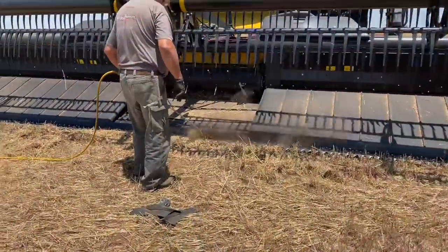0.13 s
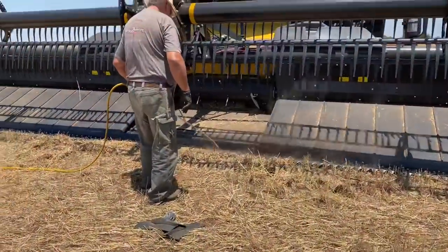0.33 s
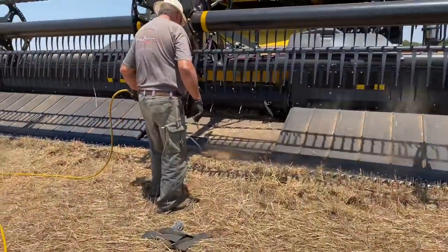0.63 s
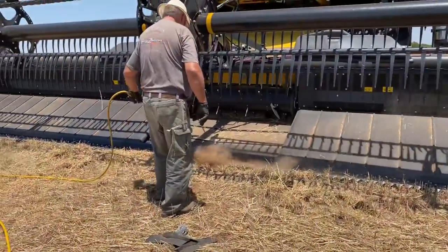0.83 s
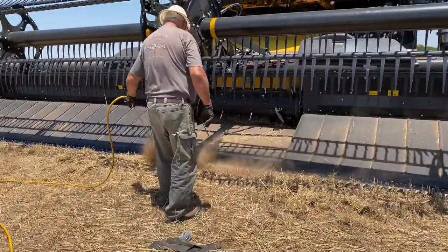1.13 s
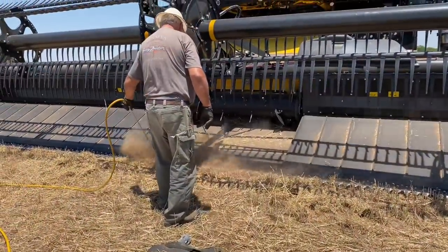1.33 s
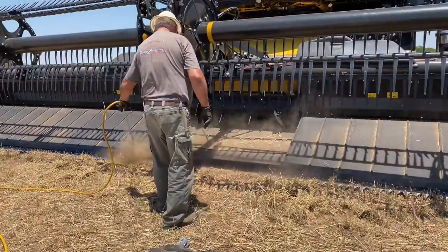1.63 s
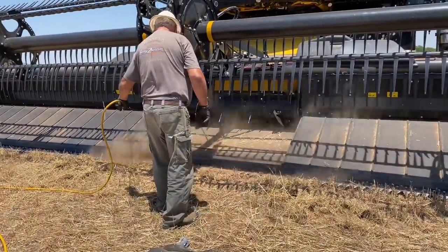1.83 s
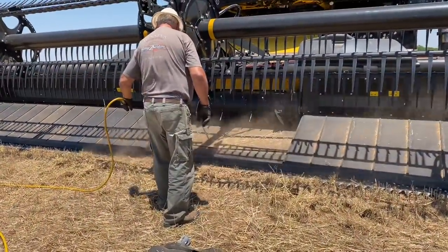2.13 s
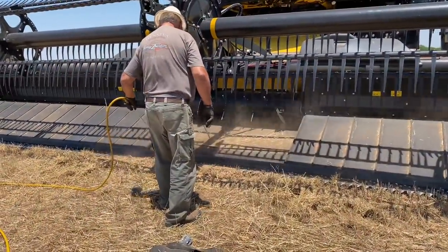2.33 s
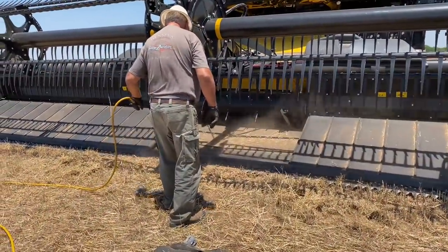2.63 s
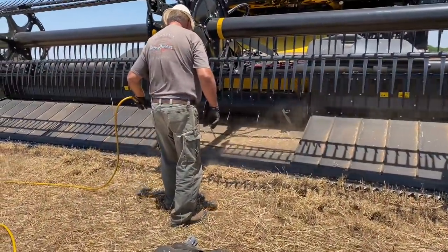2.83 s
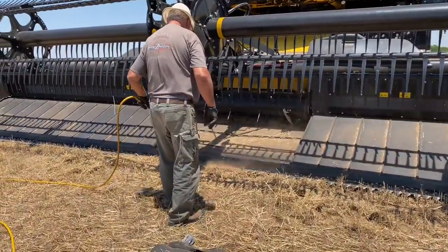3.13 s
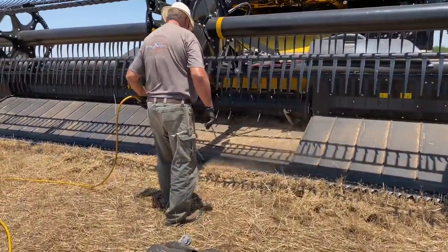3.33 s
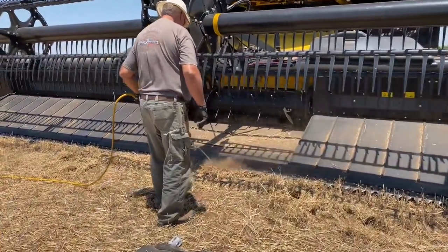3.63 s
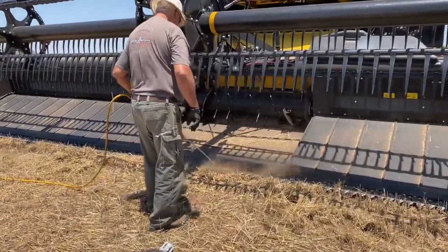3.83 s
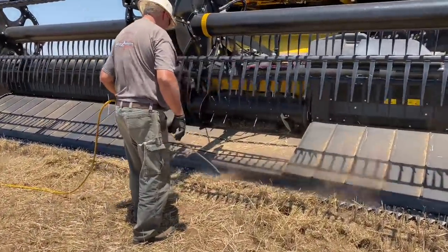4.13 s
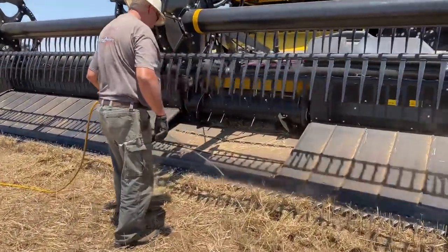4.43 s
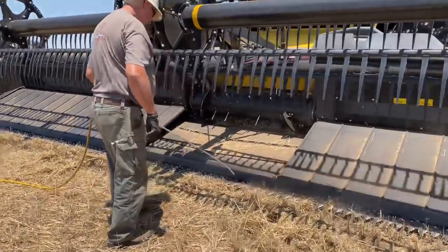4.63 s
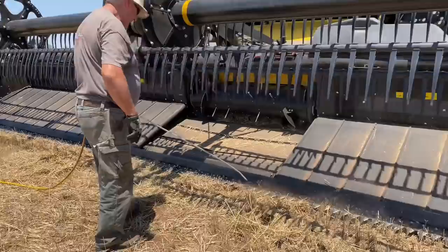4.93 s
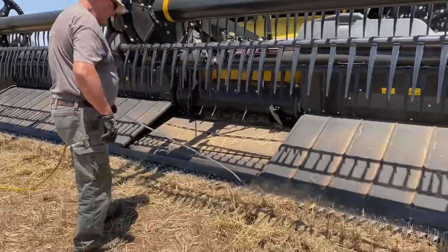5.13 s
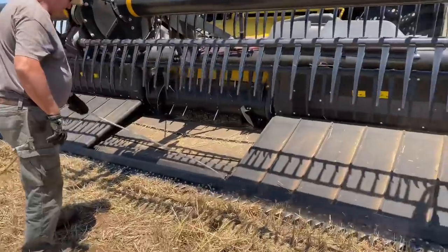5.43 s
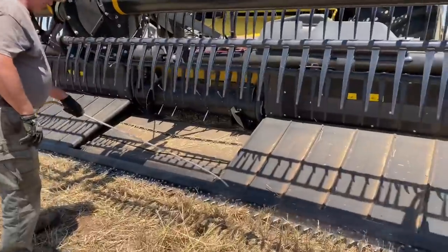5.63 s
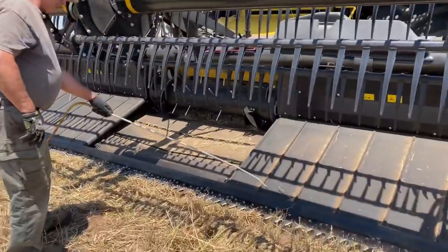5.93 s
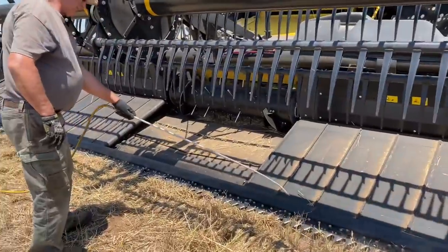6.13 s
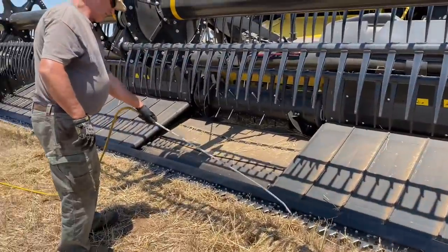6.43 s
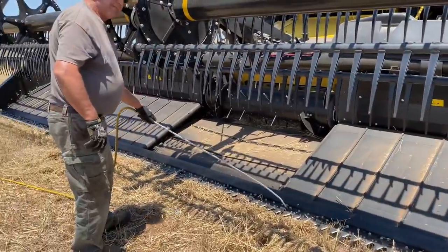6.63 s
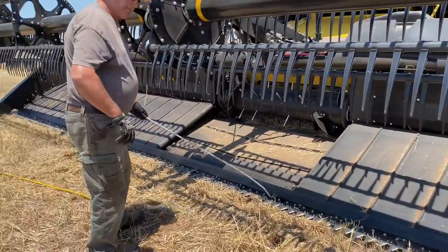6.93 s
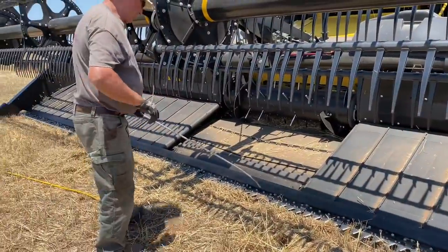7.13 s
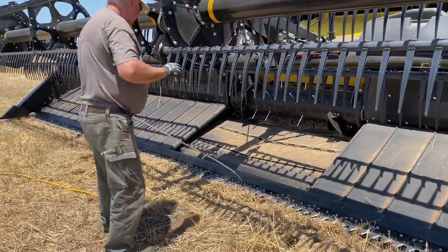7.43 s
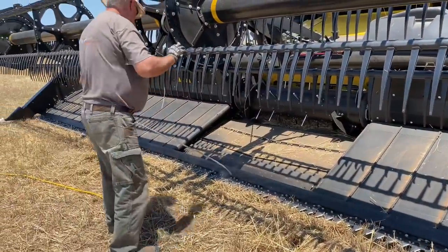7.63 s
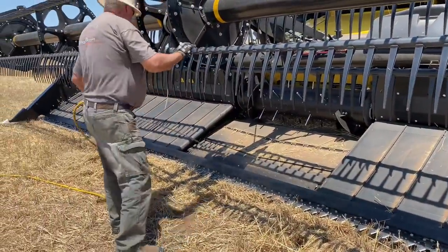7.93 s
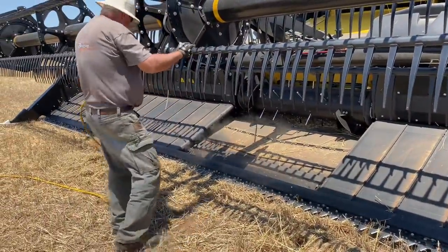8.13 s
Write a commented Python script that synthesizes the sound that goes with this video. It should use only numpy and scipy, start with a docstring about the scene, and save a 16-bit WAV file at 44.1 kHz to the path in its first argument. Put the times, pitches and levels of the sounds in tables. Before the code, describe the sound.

A wide hiss of compressed air from a blow gun runs throughout, sizzling on the steel of a combine header and rushing in its hollows. It opens with a few short blasts, softens from about 0.7 seconds, then builds again. From 3 seconds it is brighter and stronger, surging in irregular long and short blasts that shift in tone. Faint breathy hoots come at the very start and on and off between 4.3 and 7.7 seconds. From 7 to 7.8 seconds the jet gives a quick run of sharp, high spits, then weakens until the end at about 8.3 seconds. Underneath, a small compressor engine drones and whines on the left, fading from around 4 seconds. Wind buffets the microphone with a low, fluttering rumble, stronger in the first half and gusting again near 8 seconds.

```python
"""In an open field, a blow gun on a long lance cleans chaff out of a combine header.
In long and short blasts its turbulent jet hisses at the nozzle, sizzles on steel, rushes in hollows,
spits across edges and sets cavities hooting; reflections from panels and deck colour the sound.
Off to the left a single-cylinder compressor engine drones at harmonics of its firing rate,
and eddies in the wind buffet the two microphone ports."""
import sys
import numpy as np
from scipy import signal
from scipy.fft import rfft, irfft, next_fast_len
from scipy.io import wavfile
from scipy.ndimage import uniform_filter1d, map_coordinates

SR = 44100
rng = np.random.default_rng(int(sys.argv[2]) if len(sys.argv) > 2 else 0)


def to_wav(s):
    """Save 16-bit WAV."""
    ch = np.atleast_2d(s).T  # columns
    pcm = np.round(np.clip(ch, -1, 1) * 32767)  # PCM
    wavfile.write(sys.argv[1], SR, pcm.astype(np.int16))


N = 365148

# Stereo likeness of wind and hoots. Each row: frequency in Hz, likeness from 0 to 1.
LOW_LIKENESS = [(50, 1), (130, 0.96), (280, 0.93), (600, 0.94), (1500, 0.52)]


def jet():
    """Turbulence radiates broadband noise: hiss at the nozzle, sizzle and rush where the stream lands."""
    # Steady flow. Each row: time in seconds, then relative hiss, sizzle and rush in dB.
    flow = [(0.0, -32.5, -31.5, -33), (0.42, -33.5, -29, -31), (0.62, -38, -35, -32),
            (0.7, -38.5, -45.5, -35.5), (1.0, -38, -41, -34.5), (1.55, -30, -43, -33.5),
            (2.1, -30.5, -36.5, -33.0), (2.25, -37, -48.5, -32.5), (2.4, -36.5, -34.5, -33),
            (2.8, -32.5, -33, -31.5), (3.0, -24, -31.5, -31.5), (3.3, -23.5, -25.5, -32),
            (3.75, -27.5, -37, -34.5), (4.35, -26.5, -26, -35), (4.52, -27, -30.5, -33.5),
            (4.73, -26, -36.5, -35), (5.1, -26, -34, -31.0), (5.55, -25, -40.5, -33.0),
            (6.05, -25, -36, -39.5), (6.55, -27.5, -36.5, -38), (7.03, -24.5, -33.5, -43),
            (7.45, -27, -37.5, -42), (7.68, -32, -38.5, -44), (7.83, -32, -51.5, -45.0),
            (7.93, -31, -43, -45), (8.15, -30.5, -46, -41.5), (8.28, -37.0, -46, -44)]
    # Blasts on top. Each row: start and length in seconds, then relative hiss, sizzle and rush in dB.
    blasts = [(0.091, 0.154, -25, -33, -48), (0.251, 0.14, -21, -28, -36), (0.468, 0.06, -22.5, -34, -37),
              (0.557, 0.08, -37, -30, -55.5), (0.761, 0.127, -31.0, -56, -56),
              (1.347, 0.134, -56, -39, -38.5), (1.963, 0.142, -56, -41, -36),
              (2.333, 0.171, -29, -43.5, -36.5), (2.532, 0.15, -29.5, -51, -39.5),
              (2.665, 0.088, -28, -50.5, -40.5), (2.859, 0.046, -44.5, -30.5, -39),
              (3.023, 0.12, -23.5, -32.5, -36.5), (3.27, 0.2, -26.5, -32, -32.5),
              (3.482, 0.1, -23.5, -29.5, -36.5), (3.607, 0.063, -32.5, -29.5, -39),
              (3.795, 0.225, -22.5, -31, -36), (4.02, 0.168, -26, -41, -34.5),
              (4.209, 0.12, -24.5, -34, -32), (4.405, 0.07, -20, -27.5, -38.5),
              (4.542, 0.045, -24.5, -26.5, -35.5), (4.633, 0.055, -24, -25.5, -35.5),
              (4.75, 0.18, -30.5, -30, -38.5), (4.929, 0.051, -26, -34.5, -41),
              (5.223, 0.088, -24, -39, -38.5), (5.422, 0.064, -26, -54, -50),
              (5.629, 0.21, -24, -55.5, -37), (6.16, 0.177, -25, -52, -37), (6.3, 0.14, -24, -30, -35.5),
              (6.587, 0.101, -23.5, -45, -56), (6.669, 0.081, -22, -28, -34.5),
              (6.84, 0.12, -42.5, -31.5, -41.5), (7.104, 0.141, -26.5, -30, -40.5),
              (7.269, 0.045, -26, -27.5, -48.5), (7.36, 0.025, -29.5, -40, -55),
              (7.477, 0.041, -26, -33.5, -41.5), (7.555, 0.07, -32.0, -31, -49),
              (7.689, 0.064, -26.5, -34.0, -39), (7.861, 0.029, -38, -37.5, -39.5)]
    # Three spectra. Each row: frequency in Hz, relative density in dB.
    nozzle = [(600, -50), (2000, -26), (4400, -16), (5700, -9.5), (7000, -7), (8400, -3.6), (10000, -.9),
              (11000, -1.5), (12200, -2.7), (13400, -.6), (14400, .6), (15700, -1.2)]
    steel = [(1500, -40), (3500, -14.5), (4900, -7.5), (5500, -1.6), (6100, .4), (7000, -2.2), (8000, -7),
             (10000, -5), (13000, -22)]
    hollows = [(200, -15.5), (700, -3.5), (1400, -1.5), (2100, 0), (2600, 0.2), (3150, 0.5), (3800, 0.5),
               (4400, 3), (5000, 1.5), (8000, -12.5)]
    # Resonance of the hollow under the jet.
    # Each row: time in seconds, centre in Hz, gain in dB, half-width in Hz.
    hollow_mode = [(0, 4120, 4.5, 590), (.8, 4150, 2, 603), (1.2, 3020, -1.5, 500), (2.2, 3140, -0.5, 450),
                   (2.8, 4670, 2.5, 600), (3.1, 3120, 3.5, 350), (3.8, 3260, 3, 450), (4.3, 4300, 4.5, 900),
                   (4.55, 4020, 3.5, 596), (4.85, 3440, 1.5, 650), (5.7, 3440, 2.5, 704), (6, 4300, 0, 500),
                   (6.7, 3300, 1.5, 604), (8.28, 3340, 2, 600)]
    at_nozzle, on_steel, in_hollows = surging(flow, blasts, attack_s=.016, release_s=.03)
    tremble_db = .5 * wobble(45)  # the lance trembles
    hiss = at_nozzle * amp(3 + tremble_db + .8 * wobble(38)) * turbulence(nozzle, patchy_db=1.1)
    sizzle = on_steel * amp(1.46 + tremble_db + 1.2 * wobble(40)) * turbulence(steel, patchy_db=1.1)
    rush_gain = in_hollows * amp(-1.37 + .79 * wobble(60))
    rush = rush_gain * swept(turbulence(hollows, patchy_db=1.1), hollow_mode)
    return hiss + sizzle + rush


def spits():
    """Edge noise: each edge that cuts the stream gives a flare that rises faster than it falls."""
    # Each row: time in seconds, level in dB, time scale in seconds, centre in Hz, width in octaves.
    crossings = [(2.569, -28.5, 0.0078, 3350, 0.89), (3.679, -31.5, 0.018, 3500, 0.31),
                 (4.812, -31, 0.034, 3730, 0.33), (5.126, -31, 0.02, 2000, 1.7),
                 (5.323, -26.5, 0.015, 1280, 1.9), (5.315, -33, 0.025, 3320, 0.4),
                 (6.354, -23.5, 0.028, 4900, 1.05), (7.072, -16.5, 0.0051, 11900, 0.7),
                 (7.12, -14.5, 0.005, 12600, 0.76), (7.293, -13, 0.014, 9600, 0.5),
                 (7.394, -21.5, 0.0063, 12500, .6), (7.436, -19, 0.0065, 10660, 0.99),
                 (7.51, -20, 0.01, 11900, 0.8), (7.566, -16, 0.0087, 11550, 0.76),
                 (7.667, -24.5, .006, 12000, 0.46), (7.732, -12, 0.0029, 11700, 0.78),
                 (7.773, -19.5, .005, 8540, 0.77), (8.19, -39, 0.02, 2390, 1.5)]
    out = np.zeros((2, N + SR))
    t = np.arange(-SR // 8, SR // 8) / SR
    for s, db, scale_s, centre_hz, octaves in crossings:
        band = lambda hz: bell(np.log2((hz + 1) / centre_hz), octaves)
        envelope = bell(t, scale_s * np.where(t < 0, .3, 1.25))
        noise = unit(filtered(rng.standard_normal((2, len(t))), band))
        start = round((s + t[0]) * SR)
        out[:, start:start + len(t)] += amp(db) * envelope * noise
    return out[:, :N]


def hoots():
    """Cavity resonance: air crossing two openings excites a breathy band of noise in each."""
    # Each row: start and length in seconds, then levels of the deep and the high hoot in dB.
    passes = [(0, 0.25, -60, -50), (4.3, 0.85, -49, -61), (5.45, 0.36, -47, -46.5), (6.2, 0.454, -45, -56),
              (7.33, 0.37, -47, -74)]
    deep, high = np.sqrt(swells(passes, attack_s=.049, release_s=.064))

    def blown(hz, width_hz):
        return unit(filtered(rng.standard_normal((2, N)), lambda f: resonance(f, hz, width_hz) ** 2))

    pair = deep * blown(hz=357, width_hz=75) + high * blown(hz=775, width_hz=300)
    return stereo(pair, LOW_LIKENESS)


def panel_echoes(air):
    """Comb filtering: near panels mirror the jet, with delays that drift as the lance moves."""
    # Each row: mean delay in seconds, amplitude relative to the direct sound.
    reflections = [(.0011, .1), (.0024, .13), (.0046, .16)]
    n = np.arange(N)
    total = air.copy()
    for delay_s, strength in reflections:
        emitted = n - delay_s * SR * (1 + .1 * wobble(1.2))
        total += strength * np.array([np.interp(emitted, n, side) for side in air])
    return total / np.sqrt(1 + sum(strength ** 2 for _, strength in reflections))


def treble_dips(air):
    """Destructive interference: an echo off the sloping deck cancels part of the treble."""
    # Each row: time in seconds, centre in Hz, gain in dB, half-width in Hz.
    deck_notch = [(0, 7900, -4, 600), (.6, 7900, -4, 600), (1.2, 7600, -1, 600), (2.6, 7800, -1, 600),
                  (3.3, 8000, -4.5, 650), (4.3, 8200, -3.5, 650), (4.65, 8800, -8, 1050),
                  (5.5, 8600, -6.5, 1050), (6.1, 9700, -6.5, 1600), (6.8, 9500, -7, 1200),
                  (7.25, 8800, -9.5, 1050), (7.65, 8500, -8.5, 1000), (8.28, 8500, -2, 900)]
    lower_notch = [(0, 5000, -1, 300), (2.6, 5000, 0, 300), (3.3, 4100, -1, 350), (4.3, 4600, -1, 350),
                   (4.6, 4750, -2.5, 350), (5.1, 4850, -3.5, 330), (5.8, 4800, -3, 330),
                   (6.1, 3800, -2, 400), (6.35, 4400, 0, 400), (6.8, 4800, -1, 420), (7.7, 4800, -1.2, 450),
                   (8.28, 4500, -.5, 400)]  # opens just under the sizzle as the lance moves along the trough
    return swept(swept(air, deck_notch), lower_notch)


def compressor():
    """Periodic firing gives a harmonic series: whine, exhaust putter and drone, shaded by the machine."""
    # The deepening acoustic shadow. Each row: time in seconds, relative whine level in dB.
    shadow = [(0, -42), (.65, -39), (2.2, -39), (2.75, -39), (3.45, -39.5), (4.15, -45), (5.7, -49.5),
              (8.28, -52)]
    # Each row: multiple of the firing rate, relative level in dB.
    exhaust_orders = [(5, -2), (6, -15), (9, 0.5), (10, -0.5), (12, -1.5), (13, 1), (14, -2.5)]
    drone_orders = [(2, 8), (3, 1), (4, -11.5)]
    firing_hz = 27.8
    cycles = np.cumsum(firing_hz * (1 + .0014 * wobble(6))) / SR
    whine_db, = curves(shadow)
    in_sight = amp(.5 * (whine_db + 30))  # the body's ringing is shaded sooner than the fan
    rattle = np.sqrt(in_sight) * cowl_rattle(cycles) * amp([[5.5], [-3]])
    whine = engine_whine(cycles, in_sight)
    # The low orders lose only a fraction of each dB that the whine loses.
    exhaust = amp(-46.5 + .7 * (whine_db + 40)) * orders(exhaust_orders, cycles, waver_db=2.5, smear=.34)
    drone = amp(-46 + .63 * (whine_db + 40.5)) * orders(drone_orders, cycles, waver_db=2, smear=.35)
    return amp(whine_db) * (whine + rattle) + exhaust + drone


def engine_whine(cycles, in_sight):
    """Tonal radiation from the left: the cooling fan, high engine orders and one ring beside them."""
    # Each row: multiple of the firing rate, relative level in dB.
    high_orders = [(19, -7), (23, -10.5), (24, -7.5), (29, -3.5), (35, -1), (37, -0.5), (40, -13), (42, -5),
                   (45, -17), (51, -7)]
    t = np.arange(N) / SR
    fan = amp(-8) * orders([(36, 0)], cycles, waver_db=.5, smear=.45)
    ring = amp(-3 + 3.5 * wobble(20)) * np.sin(2 * np.pi * 1046 * t + 1.2 * wobble(30))
    body = amp(.5) * orders(high_orders, cycles, waver_db=2.5, smear=.91)
    tones = fan + in_sight * (body + ring)
    far_port = np.pad(tones, (14, 0))[:N]  # the right port hears them 14 samples later
    return np.array([amp(6.5) * tones, amp(-17) * far_port])


def cowl_rattle(cycles):
    """Forced vibration: every firing drives the cowl's modes with a decaying burst of noise."""
    # Each row: frequency in Hz, bandwidth in Hz, relative level in dB.
    modes = [(352, 210, -14), (787, 81, -8.5), (1008, 97, -3.5), (1443, 210, -10.5), (2075, 280, -8)]

    def cowl(f):
        modal = sum((-1) ** k * amp(db) * resonance(f, hz, bw) for k, (hz, bw, db) in enumerate(modes))
        return modal * np.exp(-(f / 3500) ** 4)

    bursts = rng.standard_normal((2, N)) * np.exp(-1.35 * (cycles % 1))
    return unit(filtered(bursts, cowl))


def wind():
    """Turbulent pressure on the ports: big eddies thump, gusts flutter and single eddies pop."""
    # The dying breeze. Each row: time in seconds, then relative buffet and flutter in dB.
    breeze = [(0.0, -36.5, -36.5), (0.6, -40.5, -41), (1.05, -38.5, -39.5), (1.6, -39, -44.5),
              (2.1, -34.5, -43), (2.8, -32.5, -39), (3.6, -38, -45.5), (4.0, -39, -46), (4.3, -36, -49.5),
              (4.55, -49.5, -47.5), (5.0, -38, -45), (5.5, -44.5, -51), (6.1, -42, -48), (6.55, -40, -46.5),
              (7.03, -49, -60.5), (7.4, -60, -58), (7.85, -50.5, -59), (8.28, -39.0, -57)]
    # Gusts on top. Each row: start and length in seconds, then relative buffet and flutter in dB.
    gusts = [(0.041, 0.099, -34.5, -39), (0.147, 0.06, -30.5, -37.0), (0.226, 0.043, -32.5, -42),
             (0.321, 0.144, -34.0, -45), (0.864, 0.085, -30, -40), (0.985, 0.035, -30.5, -34.5),
             (1.093, 0.05, -32.5, -34), (1.199, 0.048, -32, -33), (1.291, 0.14, -34, -38.5),
             (1.694, 0.128, -36.5, -37), (1.825, 0.064, -34.5, -31.0), (1.904, 0.055, -30, -28.5),
             (2.144, 0.13, -42.5, -55.0), (2.283, 0.06, -33.5, -37.5), (2.64, 0.11, -37.5, -49),
             (2.745, 0.065, -36.5, -43.5), (2.9, 0.11, -39.5, -47), (3.274, 0.13, -36, -40.5),
             (3.405, 0.14, -33.5, -37.5), (3.571, 0.11, -36.5, -51), (3.718, 0.07, -32.5, -36),
             (3.813, 0.04, -36.5, -35), (4.065, 0.098, -44, -41.5), (4.744, 0.075, -40.5, -40),
             (4.859, 0.065, -35.5, -35), (5.189, 0.021, -40, -38), (5.268, 0.09, -36.5, -44.5),
             (5.716, 0.059, -45, -43), (5.859, 0.094, -55, -41.5), (6.017, 0.039, -35.5, -41.5),
             (6.226, 0.09, -58, -42), (7.07, 0.018, -40.5, -64), (7.249, 0.049, -39, -52),
             (7.769, 0.027, -47, -42), (7.898, 0.111, -39.5, -41), (8.075, 0.046, -36.5, -42.5),
             (8.12, 0.058, -36.5, -35.5)]
    # Two spectra. Each row: frequency in Hz, relative density in dB.
    buffet_spectrum = [(18, -33), (32, -32.5), (45, -1.5), (62, 3.5), (100, 0.5), (180, -1), (280, -6.5),
                       (450, -12.5), (900, -73)]
    flutter_spectrum = [(100, -7), (250, 3.5), (380, 1), (550, -1), (800, -8.5), (1300, -15.5),
                        (3000, -92.5)]
    # Each row: time in seconds, peak before filtering in dB, half-length in seconds.
    single_eddies = [(0.186, -10.5, 0.0013), (1.889, -16, 0.00026), (4.099, -17, 0.00028)]
    big, quick = surging(breeze, gusts, attack_s=.02, release_s=.018)
    eddies = unit(amp(1.1 * wobble(25)))
    buffet = unit(amp(1.57 * wobble(70)) * turbulence(buffet_spectrum, patchy_db=-.2))
    roughness_db = 2.9 * wobble(110) + .9 * wobble(25)
    flutter = unit(amp(roughness_db) * turbulence(flutter_spectrum, patchy_db=0))
    pressure = eddies * (amp(.76) * big * buffet + amp(.7) * quick * flutter)
    t = np.arange(N) / SR
    pulses = sum(amp(db) * bell(t - s, half_s) for s, db, half_s in single_eddies)
    pops = filtered(pulses, lambda f: resonance(f, hz=370, width_hz=600))
    return stereo(pressure, LOW_LIKENESS) + pops


def swirl():
    """Antiphase pressure: air circling the microphone presses on one port as it pulls on the other."""
    # Each row: time in seconds, level in dB.
    strength = [(0, -45.5), (.2, -41.5), (.5, -37.5), (.85, -33.5), (1.03, -45), (1.3, -48.5),
                (1.42, -35.5), (1.55, -43), (1.95, -41.5), (2.12, -53), (2.4, -47), (2.9, -49.5),
                (3.35, -46), (3.9, -45), (4.22, -50), (4.3, -38), (4.45, -43), (4.62, -38), (4.85, -43),
                (5.25, -51.5), (5.75, -53), (6.1, -47), (6.75, -47.5), (7.25, -42.5), (7.65, -42),
                (8.28, -45.5)]
    # Each row: frequency in Hz, relative density in dB.
    spectrum = [(30, -22.5), (60, -13.5), (150, 1.5), (330, -0.5), (600, -4.5), (900, -9), (1400, -29.5),
                (3000, -48)]
    level_db, = curves(strength)
    return amp(level_db + wobble(30)) * turbulence(spectrum, patchy_db=1)[0] * np.array([[1], [-1]])


def turbulence(spectrum, patchy_db):
    """Random modulation: two independent coloured noises drift in patches of time and frequency."""
    z = signal.stft(rng.standard_normal((2, N)), nperseg=512)[2]
    patches = uniform_filter1d(rng.standard_normal(z.shape[1:]), size=6, axis=0)
    patches = uniform_filter1d(patches, size=22, axis=1)
    pair = signal.istft(z * amp(patchy_db * unit(patches)), nperseg=512)[1][:, :N]
    return unit(filtered(pair, lambda hz: amp(along(spectrum, hz))))


def orders(table, cycles, waver_db, smear):
    """Harmonics of the firing rate waver in the moving air, in level and in phase (smear, in radians)."""
    phase = lambda k: 2 * np.pi * (round(k) * cycles + rng.random()) + smear * wobble(16)
    return unit(sum(amp(db + waver_db * wobble(9)) * np.sin(phase(k)) for k, db in table))


def stereo(pair, likeness, phase=((1, 0), (2, 0))):
    """Partial coherence: two independent noises mix into left and right, shifted in phase."""
    angle = lambda hz: np.arccos(np.clip(along(likeness, hz), 0, 1)) / 2
    common, apart = filtered(pair, lambda hz: np.array([np.cos(angle(hz)), np.sin(angle(hz))]))
    shift = lambda hz: np.exp(.5j * np.outer([1, -1], along(phase, hz)))
    return filtered(np.array([common + apart, common - apart]), shift)


def surging(steady, surges, attack_s, release_s):
    """Incoherent addition: steady flow and surges sum in power, giving each layer's gain."""
    return np.sqrt(amp(curves(steady)) ** 2 + swells(surges, attack_s, release_s))


def swells(rows, attack_s, release_s):
    """Power envelopes that rise, hold and decay exponentially, one for each dB column."""
    start, length, *levels_db = np.transpose(rows)
    t = np.linspace(0, N / SR, N // 32)
    age = t - start[:, None]
    shape = np.clip(age / attack_s, 0, 1) * np.exp(-np.maximum(age - length[:, None], 0) / release_s)
    return np.array([np.interp(np.arange(N) / SR, t, amp(db) ** 2 @ shape ** 2) for db in levels_db])


def swept(x, rows):
    """Time-varying filtering by a peak or dip that wanders in frequency."""
    hz, t, z = signal.stft(x, SR, nperseg=256)
    s, *cols = np.transpose(rows)
    centre_hz, gain_db, width_hz = [np.interp(t, s, c) for c in cols]
    gain = amp(gain_db * bell(hz[:, None] - centre_hz, width_hz))
    return signal.istft(z * gain, SR, nperseg=256)[1][:, :N]


def filtered(x, response):
    """Linear filtering: the spectrum of x times a complex response."""
    m = next_fast_len(x.shape[-1] + SR // 4)
    return irfft(rfft(x, m) * response(np.fft.rfftfreq(m, 1 / SR)), m)[..., :x.shape[-1]]


def resonance(f, hz, width_hz):
    """The complex response of a damped oscillator."""
    return 1j * f * width_hz / (hz * hz - f * f + 1j * f * width_hz)


def wobble(rate):
    """Smooth random fluctuation, with rate knots a second."""
    at = np.linspace(0, N * rate / SR, N // 32)
    coarse = map_coordinates(rng.standard_normal(int(N * rate / SR) + 4), [at])
    return np.interp(np.arange(N) * rate / SR, at, coarse)


def curves(rows):
    """Linear interpolation in time: a value per sample for each column after the first."""
    s, *cols = np.transpose(rows)
    return [np.interp(np.arange(N) / SR, s, c) for c in cols]


def along(points, hz):
    """Interpolation on a logarithmic frequency axis."""
    f, v = np.transpose(points)
    return np.interp(np.log(hz + 1), np.log(f + 1), v)


def bell(x, width):
    """A Gaussian of height 1."""
    return np.exp(-.5 * (x / width) ** 2)


def amp(db):
    """Decibels to amplitude."""
    return 10 ** (np.asarray(db) / 20)


def unit(x):
    """Normalisation to rms 1."""
    return x / np.sqrt(np.mean(x ** 2) + 1e-20)


def scene():
    """Superposition: the air stream ahead, the compressor to the left, wind at the microphone."""
    # Stereo likeness of the hiss; from 7.8 to 11.6 kHz both channels carry the same noise.
    # Each row: frequency in Hz, likeness from 0 to 1.
    hiss_likeness = [(600, .5), (1800, .9), (3600, .8), (5000, .6), (6200, .77), (7300, .76), (7800, 1),
                     (11600, 1), (12600, .75), (15500, .68)]
    # In that band the hiss is in opposite phase and sounds wide.
    # Each row: frequency in Hz, phase between the channels in radians.
    channel_phase = [(2000, 0), (4000, .5), (5500, 1.4), (7000, 2.35), (7800, np.pi), (11600, np.pi),
                     (12500, 3.7), (14000, 4.6), (16000, 5.7)]
    air = treble_dips(panel_echoes(jet() + spits()))
    return stereo(air, hiss_likeness, channel_phase) + hoots() + compressor() + wind() + swirl()


def record(dry):
    """Band limiting: an ideal low-pass filter removes the highest treble."""
    cutoff_hz = 15780
    return filtered(dry, lambda hz: hz < cutoff_hz)


dry = scene()
out = record(dry)
to_wav(out)
```